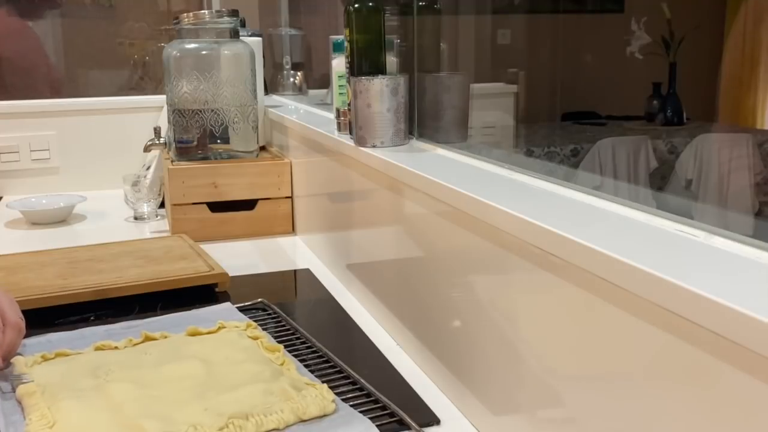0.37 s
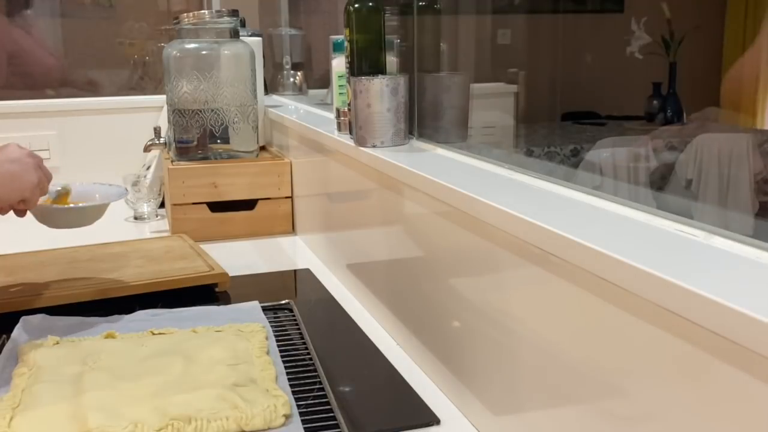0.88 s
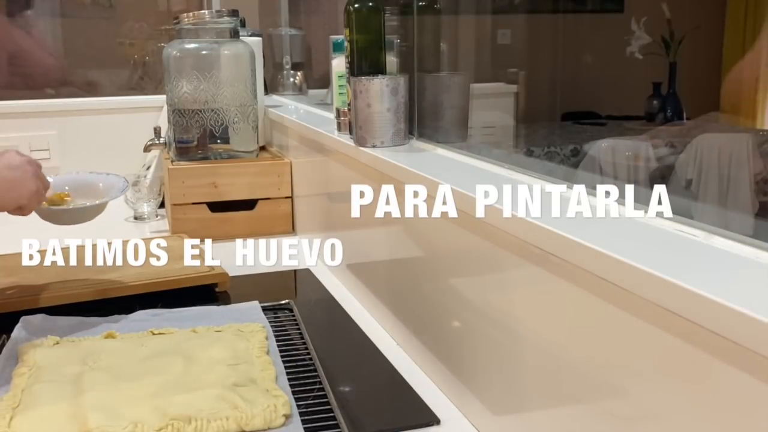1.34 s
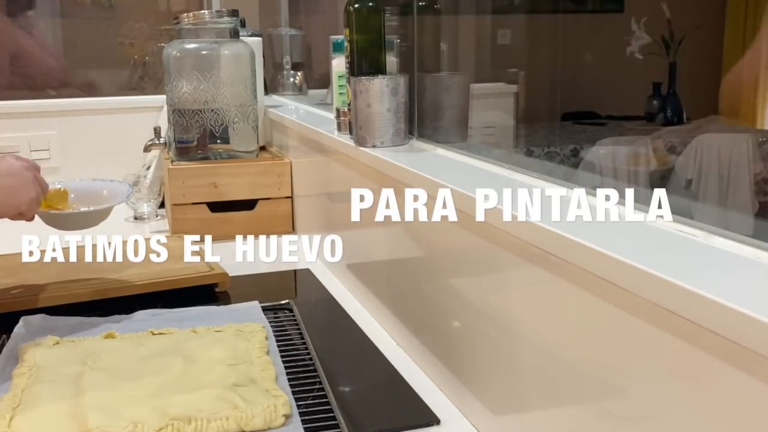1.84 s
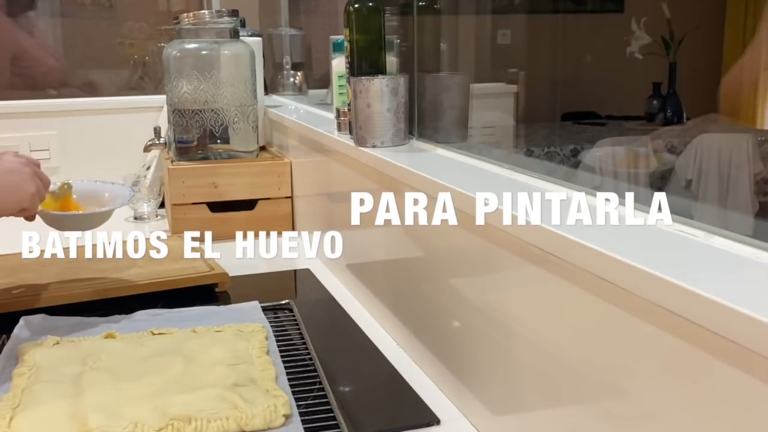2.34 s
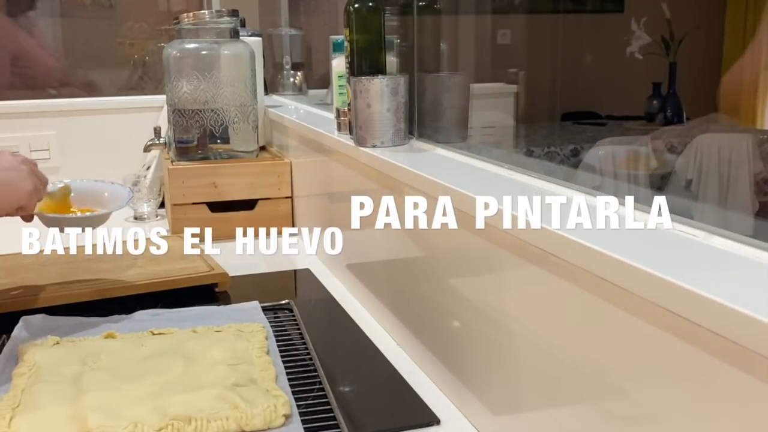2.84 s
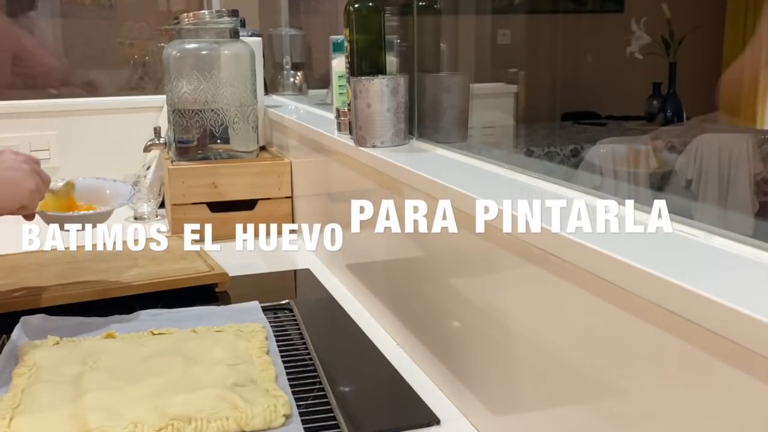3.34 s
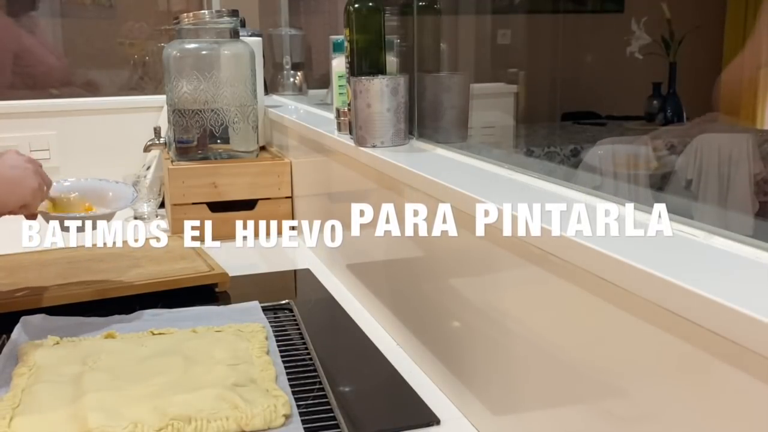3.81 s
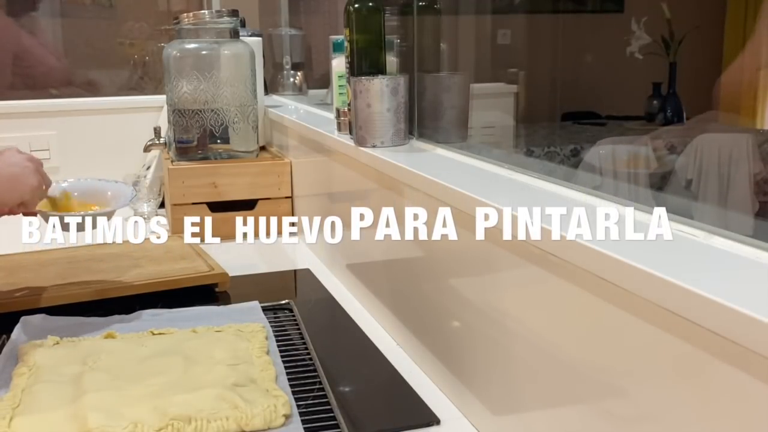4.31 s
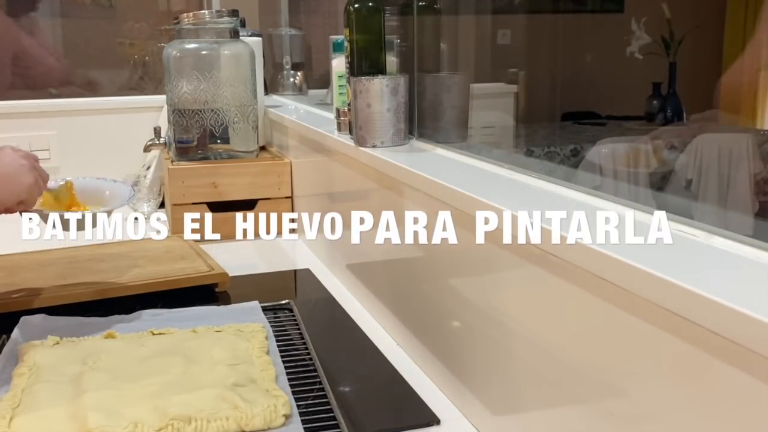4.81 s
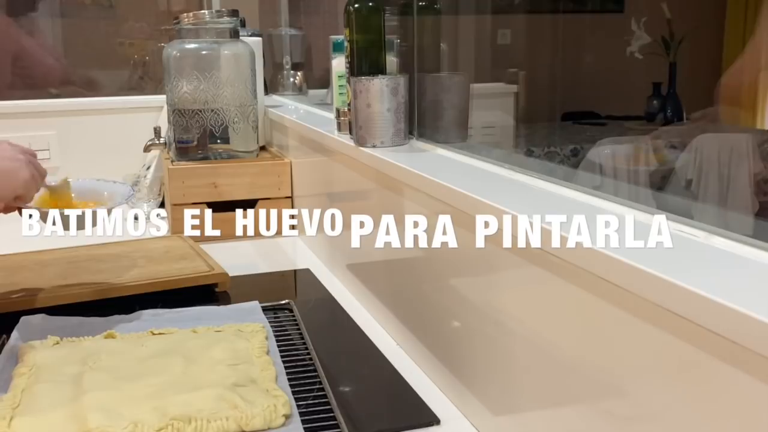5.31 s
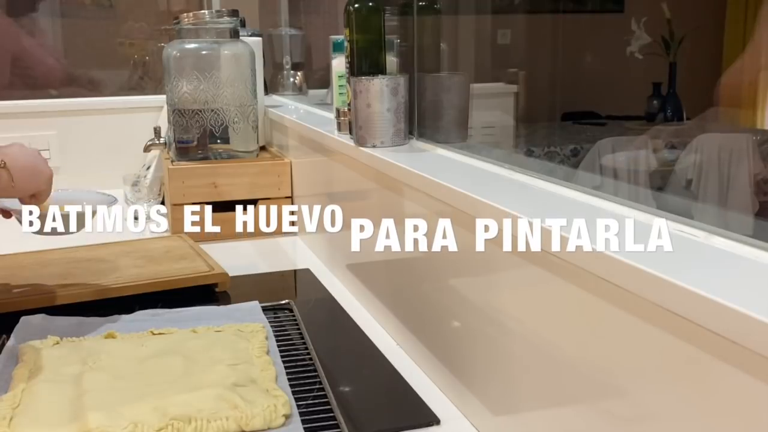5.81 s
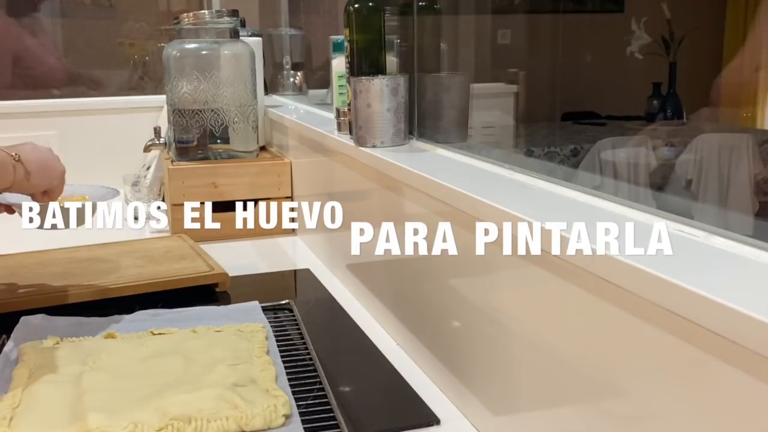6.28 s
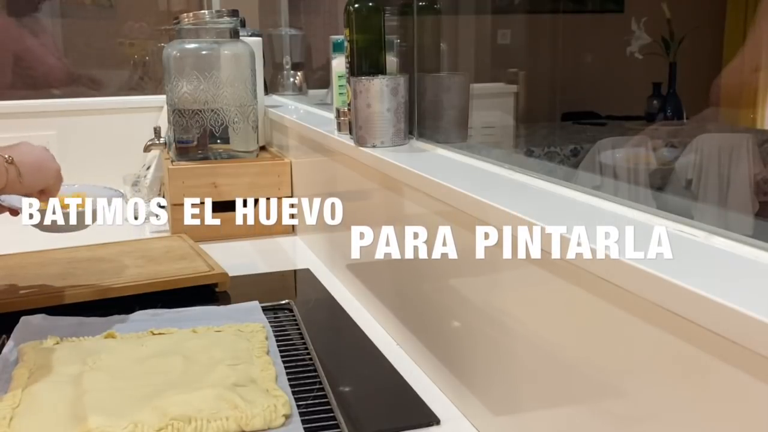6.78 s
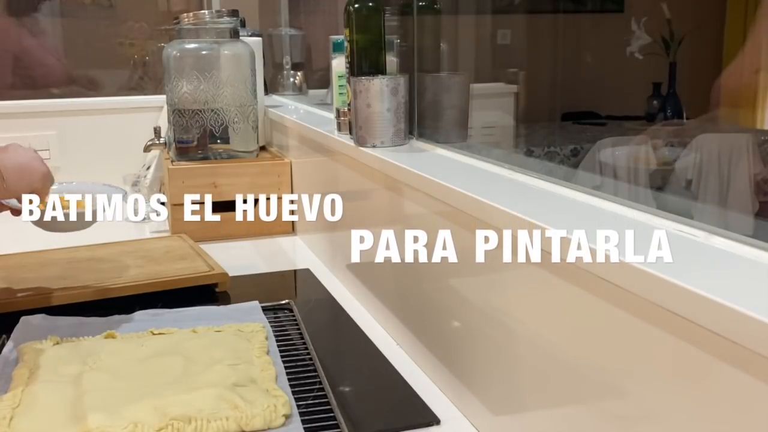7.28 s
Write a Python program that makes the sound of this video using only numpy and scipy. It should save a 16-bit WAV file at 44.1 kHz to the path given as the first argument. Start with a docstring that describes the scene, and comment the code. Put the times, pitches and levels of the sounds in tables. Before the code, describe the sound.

A quiet low hum and faint hiss, then soft thuds of a bowl on a worktop. From just after half a second, metal tines strike glazed ceramic in a quick, even rhythm, slightly varied in pitch and force. Early strokes are crisp and dry; later ones are wetter, with more egg slap and slosh. Tiles and glass return a short echo to the phone microphone until the clip stops mid-beating.

```python
"""An appliance hums in a hard kitchen: shaped noise with two mains tones. A few dull knocks, decaying sines
with scuffs of noise, come as a small ceramic bowl is taken up, the last two under the first strokes.
Then a fork beats an egg in the hand-held bowl, six strokes a second: noise bursts for the crack of tines on
glaze, decaying modes for the ring of the bowl, and a rising tone with noise for the wet slap of egg.
Tiles and glass echo knocks and strokes for about a third of a second, as noise room responses."""
import sys
import numpy as np
from scipy import signal
from scipy.fft import rfft, irfft, next_fast_len
from scipy.io import wavfile
from scipy.ndimage import uniform_filter1d

SR = 44100
rng = np.random.default_rng(int(sys.argv[2]) if len(sys.argv) > 2 else 0)


def boost_factor(decibels):
    """Convert a level in decibels to a linear amplitude factor."""
    exponent = np.asarray(decibels, float) / 20
    return 10 ** exponent


def wav_out(sig):
    """Save sig, one row per channel (or a flat mono array), as 16-bit PCM at SR to the path in sys.argv[1]."""
    wavfile.write(sys.argv[1], SR, np.round(np.clip(np.atleast_2d(sig).T, -1, 1) * 32767).astype(np.int16))


N = 337365  # length in samples
T = np.arange(8192) / SR  # clock of one stroke or knock, s
ROOMS = 6  # random room responses, used in turn by successive sounds


def shape(x, table):
    """Minimum-phase filter along the last axis from (Hz, dB) points, its phase taken from the cepstrum."""
    hz, db = np.transpose(table)
    n = next_fast_len(x.shape[-1], True)
    at = np.fft.rfftfreq(n, 1 / SR) + 1
    log_gain = np.log(boost_factor(np.interp(np.log(at), np.log(hz), db)))
    cepstrum = irfft(log_gain, n)
    # folding the cepstrum forward in time makes the filter causal
    cepstrum[1:n // 2] *= 2
    cepstrum[n // 2 + 1:] = 0
    response = np.exp(rfft(cepstrum))
    return irfft(rfft(x, n) * response, n)[..., :x.shape[-1]]


def unit(x):
    """Scale each row to unit energy."""
    return x / np.sqrt(np.sum(x ** 2, axis=-1, keepdims=True))


def place(times, rows):
    """Lay each row at its moment, on the lines of the several room responses in turn."""
    out = np.zeros((ROOMS, N + rows.shape[1]))
    for k, (start_s, row) in enumerate(zip(times, rows)):
        start = int(start_s * SR)
        out[k % ROOMS, start:start + len(row)] += row
    return out[:, :N]


# Stereo width by band. Each row: frequency in Hz, difference over sum in dB.
STEREO_WIDTH = [(60, -15), (200, -10), (380, -5), (1300, 0), (2400, -10), (3700, -11.5), (4200, -20),
                (6800, -22), (7600, -3.5), (8400, 0.5), (8800, 27), (9500, 13), (10000, -7), (10700, -1),
                (11700, -24), (12300, 4), (12800, 17), (13800, 24), (14500, -12), (15300, -24)]
# Stereo balance by band. Each row: frequency in Hz, left minus right in dB.
STEREO_LEAN = [(200, -1), (380, -0.5), (700, 1), (1290, -2), (2380, 3), (4400, 3), (8120, 0.3)]


def stereo(total, difference):
    """Left and right from unrelated sum and difference signals, with width and balance set by band."""
    hz, width_db = np.transpose(STEREO_WIDTH)
    # the sum gives up the power that the difference takes
    sum_db = -10 * np.log10(1 + boost_factor(width_db) ** 2)
    total = shape(total, np.c_[hz, sum_db])
    difference = shape(difference, np.c_[hz, sum_db + width_db])
    hz, lean_db = np.transpose(STEREO_LEAN)
    left = shape(total + difference, np.c_[hz, lean_db / 2])
    right = shape(total - difference, np.c_[hz, -lean_db / 2])
    return np.array([left, right])


# Colour of the appliance noise. Each row: frequency in Hz, relative density in dB per Hz.
HUM_COLOUR = [(15, -67), (25, -5.5), (102, -4), (229, -12.5), (317, -21), (545, -20), (1190, -28.5),
              (6740, -36), (8140, -39), (8830, -71), (9570, -42), (12200, -46), (13200, -40), (16000, -59)]
# Slow drift of the noise. Each row: time in seconds, level in dB.
HUM_LEVEL = [(0, -52.5), (.7, -51.5), (1.5, -53.5), (7.65, -53)]
# Tones of the mains. Each row: frequency in Hz, level in dB rms.
MAINS_TONES = [(100, -59), (200, -65.5)]


def hum():
    """Appliance rumble and faint hiss as shaped noise whose level drifts a little, with steady mains tones."""
    times, level_db = np.transpose(HUM_LEVEL)
    t = np.arange(N) / SR
    noise = shape(rng.standard_normal((2, N)), HUM_COLOUR)
    rumble = stereo(*noise) / np.std(noise) * boost_factor(np.interp(t, times, level_db))
    mains = sum(boost_factor(db) * np.sqrt(2) * np.sin(2 * np.pi * hz * t) for hz, db in MAINS_TONES)
    return rumble + mains


# The bowl on the worktop. Each row: start in seconds, level in dB, thud pitch in Hz,
# scuff over thud in dB, decay constant of the scuff in seconds.
BOWL_KNOCKS = [(0.218, -28, 211, -1, 0.024), (0.24, -18, 216, 2, 0.008), (0.529, -35.5, 520, -4, 0.0066),
               (0.616, -34, 420, 14, 0.045), (0.82, -26, 205, -18, .005), (1.159, -27, 190, -20, .005)]
# Colour of the scuff. Each row: frequency in Hz, gain in dB.
SCUFF_COLOUR = [(150, -14), (400, 5.5), (1000, -4), (2000, -4), (3200, 1), (4000, -4), (7000, -10.5),
                (14000, -9)]


def knocks():
    """A dull thud of the worktop, a short decaying sine, with a scuff of glaze as fading noise on top."""
    start_s, db, thud_hz, scuff_db, contact_s = np.array(BOWL_KNOCKS).T[:, :, None]
    thud = np.sin(2 * np.pi * thud_hz * T) * np.exp(-T / 0.013) * (1 - np.exp(-T / 0.00081))
    scuff = shape(rng.standard_normal(thud.shape) * np.exp(-T / contact_s), SCUFF_COLOUR)
    return place(start_s[:, 0], boost_factor(db) * (unit(thud) + boost_factor(scuff_db) * unit(scuff)))


# Decay of the echo. Each row: frequency in Hz, t60 in seconds.
ECHO_T60 = [(200, 0.38), (530, 0.3), (1400, 0.39), (3700, 0.41), (8000, 0.35), (15000, 0.26)]
# Straight path, then worktop, wall and window close by. Each row: delay in seconds, level in dB.
NEAR_SURFACES = [(0, 3), (.0022, -3), (.0048, -2), (.0085, 2)]
# Standing waves between the walls. Each row: frequency in Hz, width in Hz, gain in dB.
STANDING_WAVES = [(520, 93, 1.5), (673, 18, -5), (816, 39, 5), (926.5, 38, 7), (1180, 78, 1), (1380, 45, 0),
                  (1497, 55, 1.5), (1570, 59, -1.5), (1747, 29, 2.5)]
# The tines beam their treble, so less of it reaches the walls. Each row: frequency in Hz, gain in dB.
WALL_TREBLE = [(3000, 0), (8000, -1), (12000, -2), (16000, -9)]
EARLY_DB, EARLY_S, TAIL_DB = 6, 0.0036, 6.5  # cluster level and decay constant, tail level, before WALL_TREBLE


def kitchen():
    """Several random stereo room responses: near surfaces, a dense cluster, a tail dying band by band."""
    t = np.arange(32768) / SR
    hz, t60 = np.transpose(ECHO_T60)
    noise = rfft(rng.standard_normal((2, ROOMS, len(t))))
    at = np.fft.rfftfreq(len(t), 1 / SR) + 1
    tail = 0
    for k in range(len(hz)):
        # overlapping triangles share the spectrum out among the decay times
        triangle = np.interp(np.log(at), np.log(hz), np.eye(len(hz))[k])
        tail = tail + irfft(noise * triangle) * np.exp(-np.log(1000) * t / t60[k])
    # each standing wave adds a resonance
    standing = 1 + sum(boost_factor(db) / (1 + 2j * (at - f) / width) for f, width, db in STANDING_WAVES)
    tail = irfft(rfft(tail * (1 - np.exp(-t / 0.003))) * standing)
    early = rng.standard_normal(tail.shape) * np.exp(-t / EARLY_S) * (1 - np.exp(-t / 0.0011))
    room = boost_factor(TAIL_DB) * unit(tail) + boost_factor(EARLY_DB) * unit(early)
    room = shape(room, WALL_TREBLE)
    for delay_s, db in NEAR_SURFACES:
        room[..., int(delay_s * SR)] += boost_factor(db) * rng.choice([-1, 1], (2, ROOMS))
    return stereo(*room)[..., :len(t) // 2]


# Fork through egg onto the bowl. Each row: start in seconds, level in dB, treble from 6 to 9.5 kHz in dB,
# pitch of the mode struck squarely in Hz, egg slap in dB, starting pitch of the air pocket in Hz.
FORK_STROKES = [(.6493, -1, 6, 3600, -10.5, 1653), (.8215, 0.5, 6.5, 2720, -16.5, 1680),
                (0.9939, -1.5, 6, 3540, -9, 1176), (1.159, 1, 3, 6580, -17, 1180),
                (1.3248, 2, 3.4, 10840, -8.5, 1410), (1.49, 5, 1.5, 6730, -9.5, 1334),
                (1.6437, 2.5, -.8, 4300, -10, 1595), (1.8099, 5.5, 0.5, 4266, -12, 963),
                (1.9772, 2, 3.5, 7930, -6.5, 1754), (2.14, -1, 0.7, 3150, -8, 1783),
                (2.3062, 6, -3.5, 2580, -6, 1716), (2.4719, 3.5, 2.5, 2720, -8, 1805),
                (2.6287, 2.5, -1.5, 2262, -9, 1200), (2.7953, 3.5, -3.5, 2720, -8, 1474),
                (2.9617, 1.8, -0.5, 6780, -4.5, 1204), (3.132, 4, -4.5, 11740, -2.5, 1570),
                (3.3, 3.5, -2.5, 2790, -5, 1696), (3.462, 0, -0.2, 4445, -4.5, 952),
                (3.635, 5.5, -3, 6100, -0.3, 940), (3.7955, 4, -6, 10860, -6.5, 940),
                (3.9508, 3, -2, 2825, -4, 1590), (4.115, .6, -5, 7660, -7.5, 1785),
                (4.2804, 1.5, -7, 2727, -7.5, 1555), (4.451, 2, -8.5, 7930, -5.5, 948),
                (4.626, 4.5, -5, 3590, -1, 1223), (4.7898, 1.5, -1, 2310, -3.5, 1180),
                (4.9527, 5.5, -5, 2780, -4, 1234), (5.1151, 2, -3, 3600, -7, 1180),
                (5.276, 5, 0, 5700, -3.5, 1140), (5.4446, 2.1, -2.5, 2700, -8, 1200),
                (5.6184, 5.5, -2.5, 7930, -5.5, 1364), (5.7993, -4, 3, 3850, -13.5, 1353),
                (5.9702, 3, 0.5, 3360, -10.5, 1180), (6.1446, -2, -5, 7930, -11, 1783),
                (6.304, 1.5, -6.5, 8840, -8, 1372), (6.4751, .1, -2.5, 3710, -10.5, 1360),
                (6.6299, 3, -3.5, 8030, -11, 1610), (6.7949, 2.5, -0.5, 2720, -9, 886),
                (6.959, 0.4, -4, 3620, -6, 1486), (7.122, 0.2, -0.5, 2670, -9.5, 1258),
                (7.2878, 2.6, -5.5, 7930, -8, 1540), (7.4593, 3.5, -5, 7930, -9, 1180),
                (7.627, 0.5, 2, 8400, -13.5, 1940)]
# Modes of bowl and fork. Each row: usual pitch in Hz, usual strength in dB, t60 in seconds.
BOWL_MODES = [(2220, -11, 0.12), (2310, -0.5, 0.03), (2720, -2.5, 0.042), (2876, -3, 0.031),
              (3440, -1, 0.0088), (3600, 0, 0.026), (3850, -9.5, 0.055), (4300, -6, 0.12),
              (4785, -27, 0.025), (5680, -5, 0.0093), (6666, 3.5, 0.015), (6780, -5, 0.095),
              (7310, 8.5, 0.0069), (7696, 5.5, 0.093), (7930, 4, 0.067), (8450, 2.5, 0.02), (8640, 7, 0.02),
              (10000, -39, .03), (11350, 3.5, 0.0053), (11600, -31, .025), (14360, 14, 0.012)]
# Colour of the tines on glaze. Each row: frequency in Hz, gain in dB.
CRACK_COLOUR = [(700, -38.5), (1500, -6), (2200, -0.5), (3200, 2.5), (4000, -4), (4800, -4), (6000, -2),
                (8000, -0.5), (10000, -3), (11600, 1), (13300, -20), (14600, 7), (16000, -71)]
# Colour of the tine tip. Each row: frequency in Hz, gain in dB.
TICK_COLOUR = [(4000, -33), (8000, -16.5), (11500, 14.5), (15000, -2), (16500, -24)]
# Stroke treble above 9.5 kHz over time. Each row: time in seconds, gain in dB.
TOP_TREBLE_GAIN = [(.65, -2), (1.5, -6.5), (1.9, -11), (2.5, -6), (3, 1.5), (3.7, -5.5), (4.3, -1.5),
                   (5, -6), (5.9, -11.5), (6.5, -3), (7.2, 0.5), (7.63, -9.5)]
SQUARE_DB, SCATTER_DB = 11, 3  # gain of the mode struck squarely; spread of the others from blow to blow


def tines_on_glaze(count):
    """Tip tick, crack of four tines and gritty drag, all bursts of shaped noise."""
    # the four tines land one after another within a few ms of the tip
    since_hit = T - np.cumsum(rng.exponential(.0009, (count, 4, 1)), axis=1)
    tines = np.sum((since_hit >= 0) * np.exp(-np.abs(since_hit) / 0.0013), axis=1)
    noise = rng.standard_normal((count, 2, len(T)))
    crack = unit(shape(tines * noise[:, 0], CRACK_COLOUR))
    tick = unit(shape(np.exp(-T / 0.00083) * noise[:, 1], TICK_COLOUR))
    # the fork then drags through egg over the glaze: a gritty hiss that swells and fades
    grit_db = 5.56 * rng.exponential(1, (count, len(T)))
    grit = rng.standard_normal((count, len(T))) * boost_factor(grit_db)
    drag = unit(shape(grit * T * np.exp(-T / 0.011), CRACK_COLOUR))
    return crack + boost_factor(-2.5) * tick + boost_factor(-8) * drag


def bowl_ring(square_hz):
    """Decaying sine modes of bowl and fork, each struck as hard as the spot of the blow allows."""
    count = len(square_hz)
    usual_hz, mode_db, t60 = np.array(BOWL_MODES).T
    chance = rng.standard_normal((count, 3, len(BOWL_MODES)))
    hz = usual_hz * (1 + 0.0102 * chance[:, 0])
    struck_db = mode_db + SCATTER_DB * chance[:, 1]
    phase = 2 * chance[:, 2]
    # each blow lands squarely on one mode, at the pitch that grip and egg leave it
    nearest = np.argmin(abs(np.log(usual_hz / square_hz)), axis=1)
    spot = np.arange(count), nearest
    hz[spot] = square_hz[:, 0]
    struck_db[spot] = mode_db[nearest] + SQUARE_DB
    # egg sliding over the glaze loads the wall unevenly: all pitches wobble together
    wobble = uniform_filter1d(rng.standard_normal((count, len(T))), size=90)
    clock = np.cumsum(1 + .15 * wobble, axis=1) / SR
    ring = 0
    for k in range(len(BOWL_MODES)):
        # long modes start softer, so that the dB stand for energy
        strength = boost_factor(struck_db[:, k, None]) / np.sqrt(SR * t60[k])
        decay = np.exp(-np.log(1000) * T / t60[k])
        ring = ring + strength * decay * np.sin(2 * np.pi * hz[:, k, None] * clock + phase[:, k, None])
    return ring * (1 - np.exp(-T / 0.00065))


def strokes():
    """Tines strike the glaze and the bowl rings; treble is set stroke by stroke."""
    start_s, db, treble_db, square_hz = np.array(FORK_STROKES).T[:4, :, None]
    top_db = np.interp(start_s, *np.transpose(TOP_TREBLE_GAIN))
    blow = tines_on_glaze(len(start_s)) + boost_factor(0.5) * bowl_ring(square_hz)
    at = np.fft.rfftfreq(len(T), 1 / SR) + 1
    above_6k, above_9k = (1 / (1 + (edge / at) ** 12) for edge in (6000, 9500))
    bright = boost_factor(treble_db * (above_6k - above_9k) + top_db * above_9k)
    return place(start_s[:, 0], boost_factor(db) * irfft(rfft(blow) * bright))


# Colour of the egg splash. Each row: frequency in Hz, gain in dB.
SPLASH_COLOUR = [(300, -26), (750, -6), (1300, 1), (2000, -8), (3500, -35)]
# Colour of the egg slosh. Each row: frequency in Hz, gain in dB.
SLOSH_COLOUR = [(250, -40), (350, -6), (520, -4.5), (750, 1.5), (1200, -39.5)]
SLAP_LAG_S, SLOSH_DB = 0.001357, -15.5  # egg follows the tines; the slosh is as loud on every stroke


def slaps():
    """Egg slaps shut a pocket of air (a rising sine), splashes, and sloshes up the side (noise bursts)."""
    start_s, slap_db, pocket_hz = np.array(FORK_STROKES).T[[0, 4, 5], :, None]
    # the pocket shrinks as it closes: the pitch rises
    pocket = np.sin(2 * np.pi * pocket_hz * T * (1 + 1.6 * T))
    pocket = pocket * np.exp(-T / 0.0072) * (1 - np.exp(-T / 0.00073))
    noise = rng.standard_normal((len(start_s), 2, len(T)))
    splash = shape(noise[:, 0] * np.exp(-T / 0.0043), SPLASH_COLOUR)
    slosh = shape(noise[:, 1] * T * np.exp(-T / 0.0042), SLOSH_COLOUR)
    slap = boost_factor(slap_db) * (unit(pocket) + boost_factor(1.5) * unit(splash))
    return place(start_s[:, 0] + SLAP_LAG_S, slap + boost_factor(SLOSH_DB) * unit(slosh))


def scene():
    """Knocks, strokes and slaps heard through the kitchen, over the hum."""
    sources = knocks() + strokes() + slaps()
    heard = signal.fftconvolve(sources[None], kitchen(), axes=2)
    return heard[..., :N].sum(axis=1) + hum()


def band_limit(x):
    """A steep low-pass at the top of the band."""
    return signal.sosfilt(signal.butter(12, 16830, fs=SR, output="sos"), x)


def record(dry):
    """The phone rounds the loudest peaks and cuts deep bass and the top."""
    rounded = np.tanh(.6 * dry) / .6
    bass_cut = signal.butter(3, 45, "high", fs=SR, output="sos")
    top_cut = signal.ellip(8, .2, 70, 16700, fs=SR, output="sos")
    lean = signal.sosfilt(bass_cut, rounded)
    mix = signal.sosfilt(top_cut, lean)
    return band_limit(mix)


dry = scene()
out = record(dry)
wav_out(out)
```